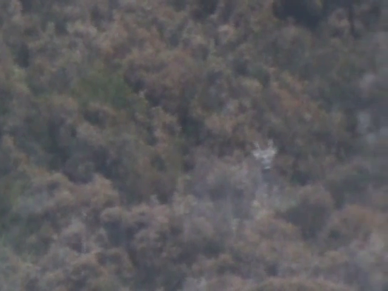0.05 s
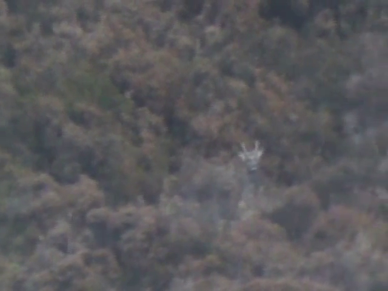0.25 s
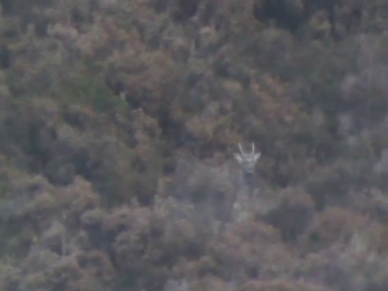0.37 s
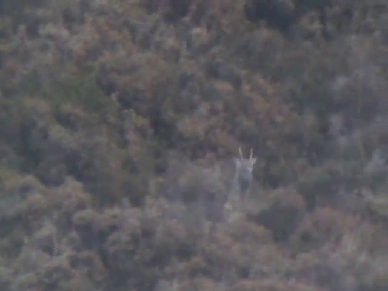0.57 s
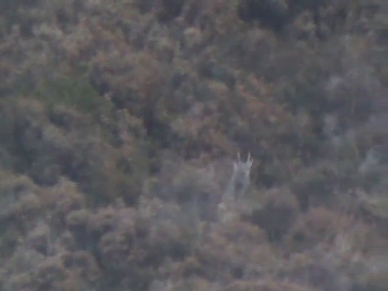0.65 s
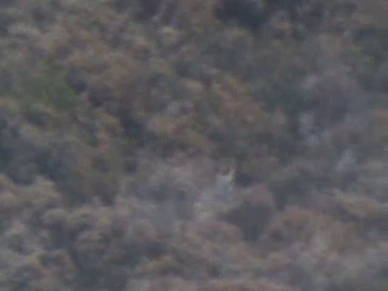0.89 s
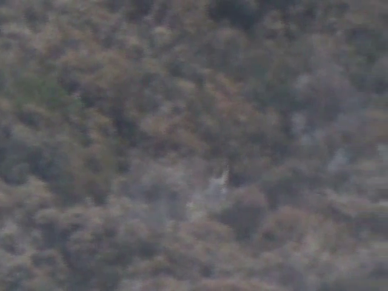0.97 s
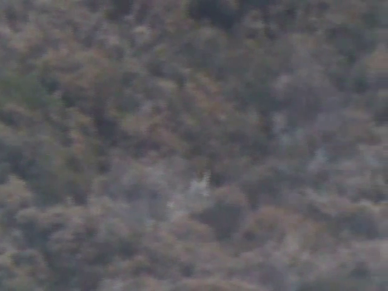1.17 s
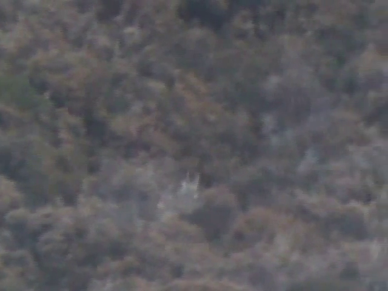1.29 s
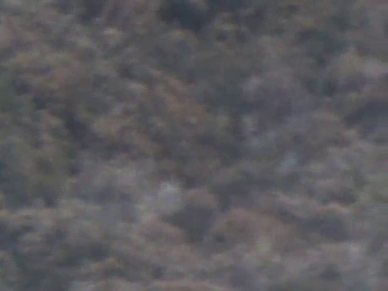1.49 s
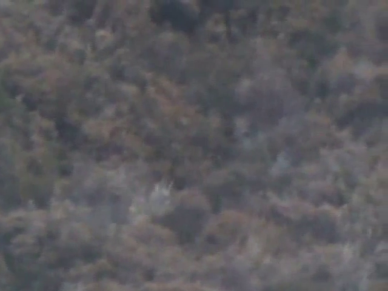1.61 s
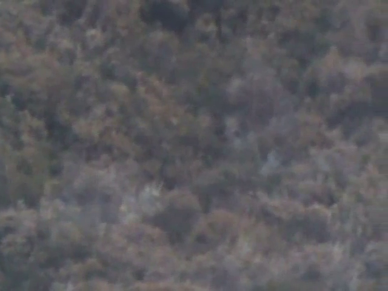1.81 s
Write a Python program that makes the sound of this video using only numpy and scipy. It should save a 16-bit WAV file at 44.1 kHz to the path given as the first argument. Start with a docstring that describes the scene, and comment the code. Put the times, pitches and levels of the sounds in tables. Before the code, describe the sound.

Two raspy crow caws about a second apart, with soft outdoor air and a thin slope echo.

```python
"""Air hisses throughout, as shaped stereo noise; far off something low throbs, as swells of resonant noise.
A crow caws twice on an open hillside, each caw a run of snaps through resonances, from rattle to harsh rasp.
Near reflections follow at once, soft bumps (damped tones) come close by, and the slope returns a thin echo.
Between the caws a small bird whistles a falling sine; bursts of coloured noise rustle close by, there and
after the second caw."""
import sys
import numpy as np
from scipy import signal
from scipy.io import wavfile
from scipy.ndimage import uniform_filter1d

SR = 44100
rng = np.random.default_rng(int(sys.argv[2]) if len(sys.argv) > 2 else 0)


def voltage_ratio(decibels):
    """Convert decibels (scalar or array-like) to amplitude ratios, 20 dB per decade."""
    exponent = np.asarray(decibels, float) / 20
    return 10 ** exponent


def pcm_store(signal):
    """Save signal as 16-bit PCM."""
    levels = np.round(np.clip(np.atleast_2d(signal), -1, 1) * 32767)
    wavfile.write(sys.argv[1], SR, levels.astype(np.int16).T)


N = 81585


def evened(x):
    """Scales to rms 1."""
    return x / np.sqrt(np.mean(x ** 2) + 1e-20)


def read(points, hz):
    """Reads a table on a log-frequency axis."""
    f, value = np.transpose(points)
    return np.interp(np.log(hz + 1), np.log(f + 1), value)


def add(mix, start_s, sound):
    """Mixes a sound in at a time."""
    part = mix[round(start_s * SR):][:len(sound)]
    part += sound[:len(part)]


def resonate(x, hz, width_hz):
    """A resonance of gain 1: shifts hz to zero, smooths with one pole, shifts back."""
    turn = np.exp(2j * np.pi * hz * np.arange(len(x)) / SR)
    r = np.exp(-np.pi * width_hz / SR)
    return 2 * (turn * signal.lfilter([1 - r], [1, -r], x / turn)).real


def resonate_twice(x, hz, width_hz):
    """Two equal resonances in series, for steeper skirts."""
    return resonate(resonate(x, hz, width_hz), hz, width_hz)


# Air spectrum. Each row: frequency in Hz, relative level in dB.
AIR_SPECTRUM = [(12, -45), (20, -4), (48, -8), (90, -7.5), (164, -7), (361, -6.5), (501, -1.5), (606, -7.5),
                (676, -7), (754, -0.5), (964, -5), (1410, -3), (1910, -7), (3030, -9), (5100, -12.5),
                (5530, -10.5), (9810, -18.5), (12500, -23.5), (13600, -28.5)]
# Stereo width of the air. Each row: frequency in Hz, left-right likeness from 0 to 1.
AIR_LIKENESS = [(30, 1), (130, 0.85), (400, 0.54), (1300, 0.29), (2800, 0.25), (6000, 0.63), (13000, 0.62)]
AIR_RMS_DB, AIR_PATCHY_DB, AIR_SWELL_DB = -54, .8, .25


def air():
    """Random short-time spectra with drifting patches and a slow swell."""
    frames, hz = N // 256 + 5, np.fft.rfftfreq(1024, 1 / SR)
    a, b, c, d, patches = rng.standard_normal((frames, 513, 5)).T
    patches = evened(uniform_filter1d(uniform_filter1d(patches, 12, 0), 10, 1))
    swell = evened(uniform_filter1d(rng.standard_normal(frames), 20))
    same = np.clip(read(AIR_LIKENESS, hz), 0, 1)[:, None]
    mid = (a + 1j * b) * np.sqrt(1 + same)
    side = (c + 1j * d) * np.sqrt(1 - same)
    level_db = read(AIR_SPECTRUM, hz)[:, None] + AIR_PATCHY_DB * patches + AIR_SWELL_DB * swell
    spectra = np.array([mid + side, mid - side]) * voltage_ratio(level_db)
    noise = signal.istft(spectra, nperseg=1024, noverlap=768)[1][:, :N]
    return voltage_ratio(AIR_RMS_DB) * evened(noise)


# Far throb. Each row: peak time in seconds, relative level in dB, pitch in Hz, rise and fall in seconds.
THROB_SWELLS = [(.15, -59.5, 595, 0.04, 0.12), (.43, -56, 650, 0.054, 0.071),
                (0.701, -57, 557, 0.044, 0.038), (0.941, -58.5, 600, 0.011, 0.083),
                (.99, -60.5, 574, 0.044, 0.036), (1.25, -59, 590, 0.044, 0.11),
                (1.802, -54, 674, 0.015, 0.038), (1.845, -55.5, 596, 0.0049, .02)]
THROB_WIDTH_HZ = 166  # of each of the two passes


def throb():
    """Swells of noise in one low resonance, partly alike left and right."""
    t, out = np.arange(N) / SR, np.zeros((2, N))
    for peak_s, db, hz, rise_s, fall_s in THROB_SWELLS:
        noises = rng.standard_normal((3, N))
        shared, left, right = (evened(resonate_twice(v, hz, THROB_WIDTH_HZ)) for v in noises)
        swell = np.exp(-((t - peak_s) / np.where(t < peak_s, rise_s, fall_s)) ** 2)
        out += voltage_ratio(db) * swell * (shared + .5 * np.array([left, right]))
    return out


def throat(x, bands):
    """Parallel steep resonances of alternating sign."""
    rings = [(-1) ** k * voltage_ratio(db) * resonate_twice(x, hz, width_hz)
             for k, (hz, width_hz, db) in enumerate(bands)]
    return sum(rings) * SR / 1200


# Rattles of the throat, one list per caw; its first row only opens the caw. Each row: end (last snap) in
# seconds, relative body level in dB, body dip in dB, relative treble level in dB, treble dip in dB, dip curve
# as a power. The dips set the earlier snaps against the last.
CAW_RATTLES = [
    [(.2015, -70, 0, -70, 0, 1), (.216, -51, 14, -46, 16, .5), (.231, -54, 8, -46, 12, .5),
     (.2454, -37, 22, -34, 24, .5), (.2615, -35, 22, -33, 24, .5), (.2768, -32, 21, -30, 26, .6),
     (.2949, -33, 17, -32, 22, 1.1), (.3125, -34, 10, -29, 24, 1.2), (.3328, -32, 5, -29, 11, 1.2),
     (.3524, -31, 2, -29, 10, 1), (.3747, -31.5, 1, -29, 9, 1), (.3995, -30.5, 1, -29, 9, 1.3),
     (.4241, -30.5, 0, -30, 10, 3), (.4471, -34, -4, -32, 14, 4), (.4599, -44, -11, -47, -12, 1)],
    [(1.348, -70, 0, -70, 0, 1), (1.3632, -41, 30, -40, 22, .4), (1.3785, -42, 20, -46, 14, .4),
     (1.3934, -38, 22, -41, 18, 1.2), (1.408, -36, 16, -39, 18, .8), (1.4252, -35, 14, -39, 13, 1),
     (1.442, -34.5, 8, -37, 14, .8), (1.4614, -34, 2, -38, 5, 1), (1.4803, -33.5, 0, -35, 12, 1.5),
     (1.5018, -33, 0, -32, 13, 1.3), (1.5258, -31.5, 0, -31, 12, 1.5), (1.5498, -31, -1, -31, 16, 2.2),
     (1.5725, -35, -5, -36, 14, 3), (1.582, -46, -10, -50, -4, 1)],
]
# Throat resonances. Each row: frequency in Hz, width of each pass in Hz, relative level in dB.
HUM_BANDS = [(342.6, 303, -18), (730, 550, -17.5)]  # even through the rattle
BODY_BANDS = [(1255, 240, 3), (1630, 220, -9), (2850, 400, -11), (1000, 250, -14)]
TREBLE_BANDS = [(2200, 1500, -17.5), (3700, 914, -10)]
TOP_BANDS = [(4800, 1360, -18.5), (6080, 960, -22), (7760, 1540, -24)]  # grows faster with effort
TOP_STEEPER = 0.33  # extra dB per dB of treble
SNAPS_PER_S, PAUSE_S = 460, .0047  # set the snap count: rate times rattle length less the pause
QUICK, QUICK_UNTIL = .115, .53  # share by which gaps vary; fraction of the rattle where short turns to long
JITTER_S, SHIMMER_DB, BREATH = .00007, 1.5, .07
LOW_CUT_HZ, HIGH_CUT_HZ = 270, 8800


def crow():
    """Each rattle is a run of snaps: quick and dull at first, slower and sharper to its end."""
    trains, near = np.zeros((4, N)), np.arange(-16, 17)
    for caw in CAW_RATTLES:
        for before, rattle in zip(caw, caw[1:]):
            start_s, before_db = before[:2]
            end_s, db, dip_db, treble_db, treble_dip_db, curve = rattle
            count = round((end_s - start_s - PAUSE_S) * SNAPS_PER_S)
            u = np.arange(1, count + 1) / count
            gaps = 1 + QUICK * np.sin(2 * np.pi * (u - QUICK_UNTIL))
            chance = rng.standard_normal((count, 2))
            snap_s = start_s + (end_s - start_s) * np.cumsum(gaps) / gaps.sum()
            at = (snap_s + JITTER_S * chance[:, 0]) * SR
            place = at.astype(int)[:, None] + near
            snap = -np.sinc(place - at[:, None]) * np.hanning(len(near))
            snap = snap * voltage_ratio(SHIMMER_DB * chance[:, 1:])
            early = (1 - u) ** curve
            hum_db = before_db + (db - before_db) * u
            body_db = db - dip_db * early
            bright_db = treble_db - treble_dip_db * early
            top_db = bright_db + TOP_STEEPER * (bright_db + 30)
            levels_db = np.array([hum_db, body_db, bright_db, top_db])
            trains[:, place] += snap * voltage_ratio(levels_db)[..., None]
    hum, body, treble, top = trains
    effort = signal.lfilter([1], [1, -.97], -uniform_filter1d(treble, size=9))
    breath = BREATH * effort * rng.standard_normal(N)
    voice = throat(hum, HUM_BANDS) + throat(body, BODY_BANDS)
    voice = voice + throat(treble + breath, TREBLE_BANDS) + throat(top + breath, TOP_BANDS)
    band = signal.butter(4, [LOW_CUT_HZ, HIGH_CUT_HZ], "band", fs=SR, output="sos")
    return signal.sosfilt(band, voice)


def echo(x, t60s, delay_s):
    """Sparse taps of random sign, each band dying at its own speed."""
    taps = np.zeros((2, SR))
    at = np.arange(0, SR - 20, 20) + rng.integers(0, 20, (2, (SR - 1) // 20))
    np.put_along_axis(taps, at, rng.choice([-1., 1.], at.shape), 1)
    hz, t, z = signal.stft(taps, SR, nperseg=128)
    decay = voltage_ratio(-60 * t / read(t60s, hz)[:, None])
    tail = signal.istft(z * decay, SR, nperseg=128)[1]
    tail = np.pad(tail / np.linalg.norm(tail[0]), ((0, 0), (round(delay_s * SR), 0)))
    return signal.fftconvolve(x[None], tail, axes=1)[:, :N]


NEAR_DB, NEAR_T60_S, NEAR_DELAY_S = -11, .035, 0.001064


def near_reflections(bird):
    """A short tail with one decay time at all frequencies."""
    return voltage_ratio(NEAR_DB) * echo(bird, [(1000, NEAR_T60_S)], NEAR_DELAY_S)


# Soft bumps. Each row: start in seconds, relative level in dB, pitch in Hz, t60 in seconds.
BUMP_TONES = [(.22, -53, 227, 0.034), (0.474, -52.5, 213, 0.037), (.796, -53.5, 217, 0.084),
              (0.884, -66.5, 35, 0.16), (1.813, -63, 139, .05)]
BUMP_ATTACK_S = 0.0013


def bumps():
    """Short damped low tones."""
    t, out = np.arange(8000) / SR, np.zeros(N)
    for start_s, db, hz, t60_s in BUMP_TONES:
        envelope = voltage_ratio(db - 60 * t / t60_s) * np.minimum(t / BUMP_ATTACK_S, 1)
        add(out, start_s, envelope * 2 * np.sin(2 * np.pi * hz * t))
    return out


# Echo decay of the slope. Each row: frequency in Hz, t60 in seconds.
SLOPE_T60 = [(300, 0.77), (1200, 0.85), (3000, 0.93), (7000, 0.1)]
SLOPE_DB, SLOPE_DELAY_S = -23, .045


def slope_echo(bird):
    """A thin delayed tail whose highest band dies soonest."""
    return voltage_ratio(SLOPE_DB) * echo(bird, SLOPE_T60, SLOPE_DELAY_S)


# Small bird. Each row: time in seconds, pitch in Hz, rms level in dB.
WHISTLE_PATH = [(.6, 7250, -80), (.625, 6850, -67), (.66, 6200, -66), (.7, 5600, -66), (.74, 5180, -68),
                (.775, 4900, -74)]


def whistle():
    """A falling sine."""
    t, (s, pitch_hz, db) = np.arange(N) / SR, np.transpose(WHISTLE_PATH)
    level = np.sqrt(2) * voltage_ratio(np.interp(t, s, db, -200, -200))
    phase = 2 * np.pi * np.cumsum(np.interp(t, s, pitch_hz)) / SR
    return level * np.sin(phase)


# Rustle. Each row: start in seconds, starting level in dB, centre in Hz, t60 in seconds.
RUSTLE_BURSTS = [(0.713, -51, 5500, .015), (1.786, -53.5, 2200, 0.086), (1.816, -40, 900, 0.012),
                 (1.822, -48, 2360, 0.053)]


def rustle():
    """Brief decaying bursts of noise, coloured by a broad resonance."""
    t, out = np.arange(8000) / SR, np.zeros(N)
    for start_s, db, hz, t60_s in RUSTLE_BURSTS:
        noise = evened(resonate_twice(rng.standard_normal(len(t)), hz, 0.65 * hz))
        add(out, start_s, voltage_ratio(db - 60 * t / t60_s) * noise)
    return out


RIGHT_DB = .8  # direct crow, right over left


def scene():
    """Crow, its echoes and the background."""
    bird = crow()
    direct = bird * voltage_ratio(np.array([[0], [RIGHT_DB]]))
    wet = near_reflections(bird) + slope_echo(bird)
    return air() + throb() + direct + wet + bumps() + whistle() + rustle()


def roll_off(x):
    """The treble ends steeply here."""
    return signal.sosfilt(signal.butter(12, 13760, fs=SR, output="sos"), x)


def record(dry):
    """Delivers the finished mix."""
    return roll_off(dry)


dry = scene()
out = record(dry)
pcm_store(out)
```